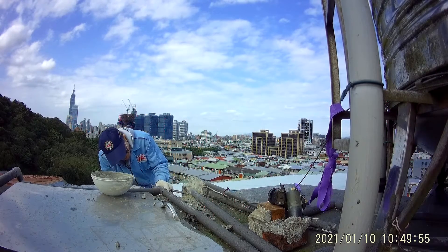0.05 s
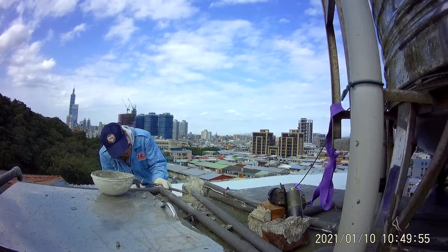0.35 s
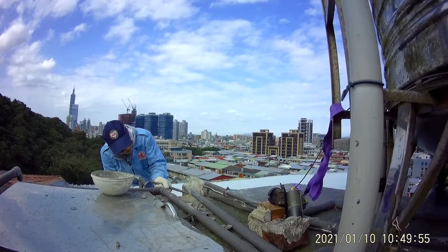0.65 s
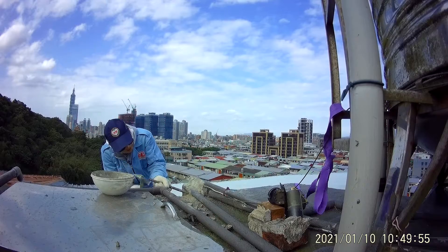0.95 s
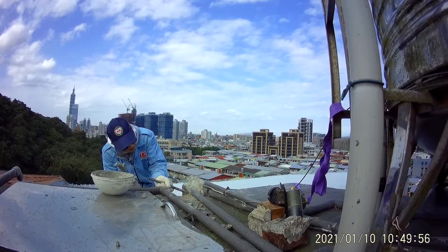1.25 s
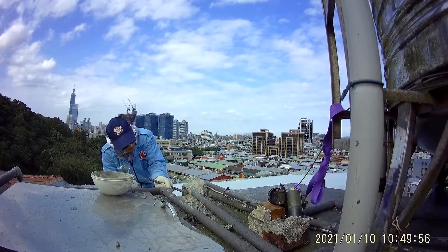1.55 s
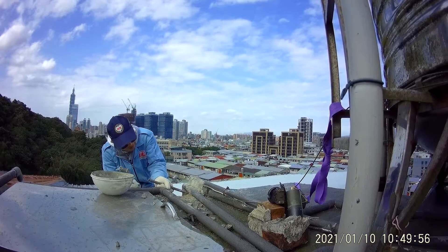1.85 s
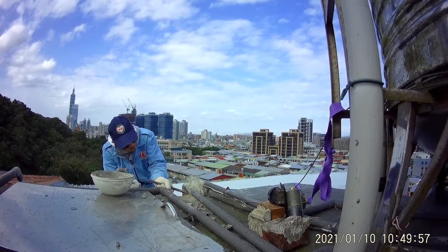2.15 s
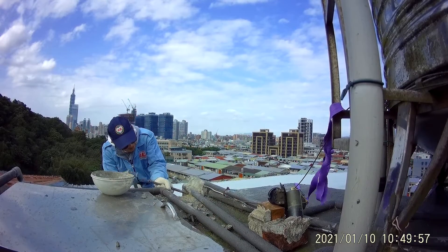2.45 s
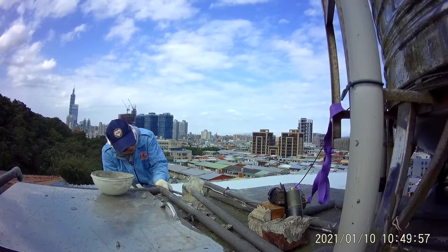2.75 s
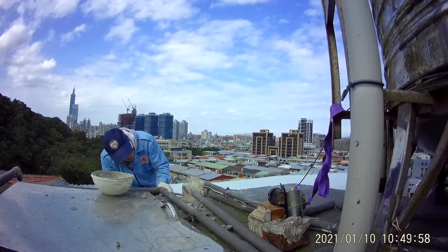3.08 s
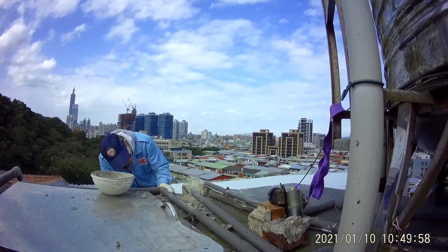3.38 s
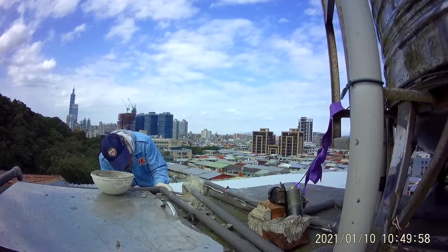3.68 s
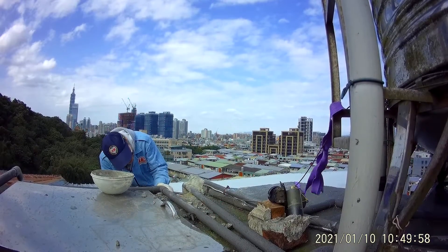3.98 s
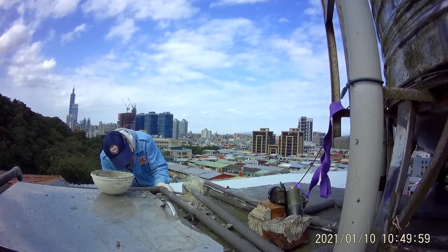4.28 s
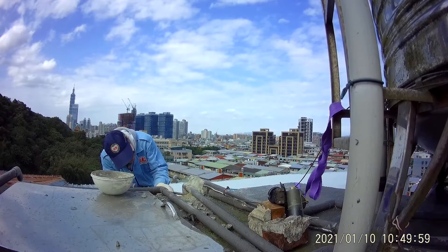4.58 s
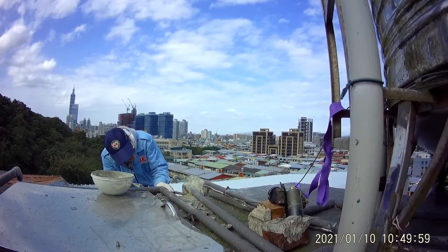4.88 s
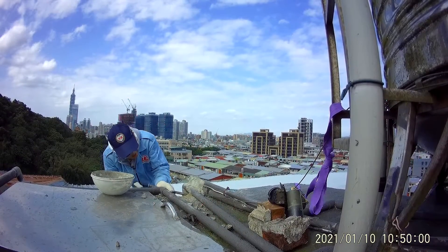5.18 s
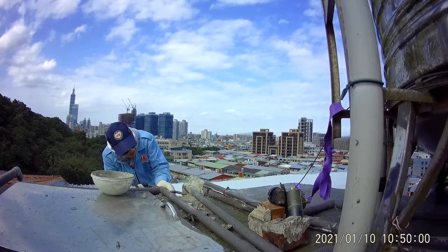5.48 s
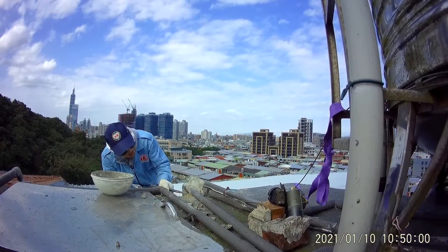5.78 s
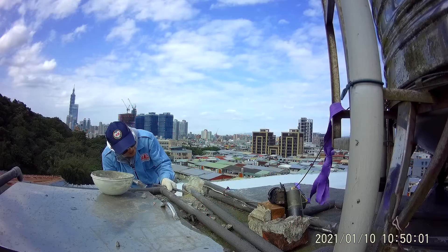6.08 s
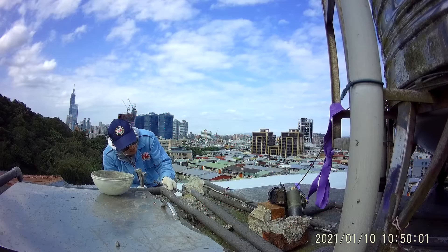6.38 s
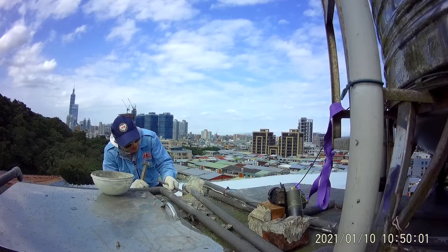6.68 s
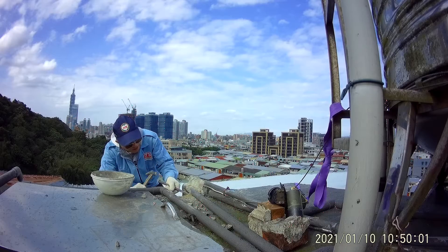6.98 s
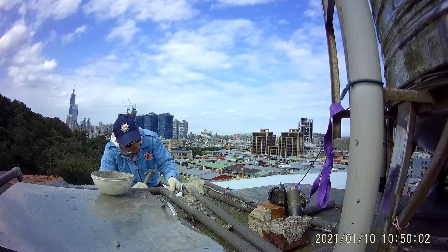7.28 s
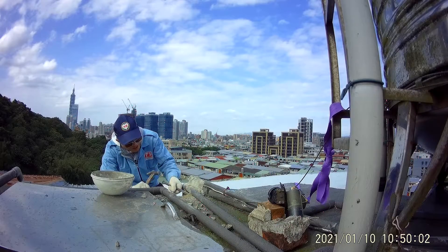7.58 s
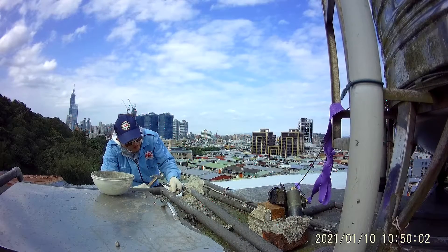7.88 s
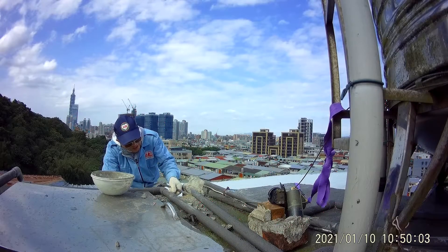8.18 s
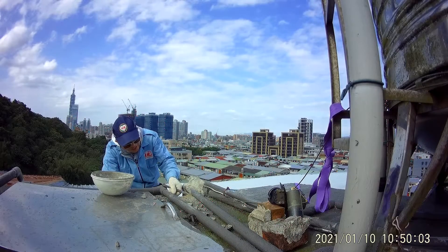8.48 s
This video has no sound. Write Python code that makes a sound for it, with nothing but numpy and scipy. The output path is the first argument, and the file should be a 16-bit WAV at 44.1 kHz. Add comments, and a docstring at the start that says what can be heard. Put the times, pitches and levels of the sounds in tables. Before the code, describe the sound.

Gusts of wind buffet a small outdoor microphone while far-off city traffic rumbles evenly. Over this, a hammer hits a steel chisel against stone: a single blow, a quick run of five, then seven lighter ones and, after a pause, six harder knocks. Each has a short metallic ring and a faint echo off the surrounding roofs and houses, with a few tiny ticks of grit.

```python
"""On a rooftop, houses nearby and traffic in the distance, heard through a small camera's microphone.
A hand hammer drives a steel chisel into masonry in short runs of hard knocks; the roof, a wall and the
houses answer. Now and then the chisel rings on or rebounds, or grit ticks. Gusts buffet the microphone;
the camera's housing colours each blow's bright ring, and its electronics add a faint whine and hiss."""
import sys
import numpy as np
from scipy import signal
from scipy.fft import rfft, irfft, next_fast_len
from scipy.io import wavfile
from scipy.ndimage import map_coordinates

SR = 44100
rng = np.random.default_rng(int(sys.argv[2]) if len(sys.argv) > 2 else 0)


def wrap_up_sound(samples):
    """Save the sound to the file named by the first command line argument, as 16-bit audio."""
    columns = np.atleast_2d(samples).T
    # keep every value between -1 and 1, then stretch to whole-number steps
    tamed = np.clip(columns, -1, 1)
    steps = np.round(tamed * 32767).astype(np.int16)
    wavfile.write(sys.argv[1], SR, steps)


N = 376613
TIME = np.arange(N) / SR
AGE = np.arange(SR // 3) / SR  # seconds since a contact

# Far traffic, wind thumping on the microphone, and its rush. Each row: frequency in Hz, density in dB.
TRAFFIC_SPECTRUM = [(25, 1), (250, -5), (500, -23), (1000, -30), (1500, -25), (2000, -56), (2700, -41),
                    (3400, -49.5), (4700, -44), (5600, -48.5), (12000, -62)]
BUFFET_SPECTRUM = [(8, -16), (25, 0), (75, -5), (140, -12), (280, -25), (600, -39), (2000, -103)]
RUSH_SPECTRUM = [(60, -14), (150, 0), (280, -1.5), (500, -7.5), (950, -15.5), (1550, -17.5), (2050, -32),
                 (2600, -34), (3400, -49.5), (4100, -52), (4700, -45), (5500, -55), (12000, -67)]
# Gusts at the microphone. Each row: time in seconds, strength in dB.
GUSTS = [(0, -27.5), (.21, -2), (.38, -11), (1.02, -9.5), (1.27, 1.5), (1.75, -4), (2.42, -5.5), (2.72, -4),
         (3.14, -8), (3.33, -2), (3.6, 2), (3.82, -4), (4.0, 2), (4.9, -2.5), (5.05, -8.5), (5.3, -14.5),
         (5.48, -7), (6.25, -13), (7.14, -13.5), (7.41, 0), (7.8, -15), (8.18, -11.5), (8.54, -27.5)]
# Sharp puffs of wind. Each row: centre in seconds, relative level in dB, half length in seconds.
PUFFS = [(.571, -26, 0.042), (0.864, -23.5, 0.025), (1.194, -15.5, 0.017), (1.828, -8.5, 0.014),
         (1.881, -9.5, 0.012), (2.188, -17.5, 0.022), (2.677, -16, 0.015), (2.788, -14, 0.0064),
         (2.9, -14.5, 0.011), (3.094, -17, 0.0098), (3.289, -15, 0.047), (3.578, -20, 0.021),
         (4.639, -19.5, 0.01), (4.898, -14.5, 0.0056)]

# Hammer blows. Each row: start in seconds, force in dB, squareness in dB, knock pitch in Hz,
# sharpness in dB, hammer ring in dB. Force, squareness and sharpness are 0 for an average blow.
HAMMER_BLOWS = [(0.6559, 0.5, 4, 1420, 9.5, -31), (1.418, -0.5, 5, 1590, 7.5, -37),
                (1.7029, -2, 5.5, 1282, 3, -24.5), (1.9734, -4, 3, 1314, -0.5, -26.5),
                (2.2454, -2, 5, 1250, 7, -22), (2.5132, -1.5, 2, 1304, -0.5, -33.5),
                (3.7997, -3.5, -1.5, 1347, 2.5, -19.5), (4.093, -5, -3.5, 1420, 0.5, -29),
                (4.3743, -8.5, 1, 1580, -3, -36), (4.654, -4, 2.5, 1560, -10, -46),
                (4.9233, -5.5, -3, 1450, -10, -36), (5.3163, -4, -1, 1300, -3.5, -40.5),
                (5.584, -5, 5.5, 1510, -10.5, -37.5), (7.038, 2.5, -1, 1550, -7, -36.5),
                (7.3548, 6, -5, 1486, 2, -37.5), (7.652, 5.5, 0, 1784, 3, -31),
                (7.941, 6, -.5, 1692, 3, -43), (8.216, 7, -4, 1770, 2.5, -38.5),
                (8.4844, 8, -7.5, 1490, -5.5, -47)]
# Modes of the masonry, the sheet roof and the free chisel.
# Each row: frequency in Hz, relative level in dB, time to fall 60 dB (t60) in seconds.
MASONRY_MODES = [(742, -12, 0.022), (799, -5.5, 0.025), (1026, 0, 0.012)]
SHEET_MODES = [(328, -0.5, 0.12), (432.4, -9, 0.11), (620, -4, 0.095)]
FREE_CHISEL_MODES = [(1020, -1, .06), (2750, 0, .062), (5155, -6, .07), (6172, -11, .15), (10230, 0, .11)]
# Bright ringing of each blow, coloured by the camera housing's resonances (middle, high, highest).
# Each row: frequency in Hz, relative level in dB, t60 in seconds.
HOUSING_MID = [(3214, 8.5, 0.0084), (3970, 0, 0.022), (4650, 3.5, 0.026), (4787, -1, 0.027)]
HOUSING_HIGH = [(6085, 1, 0.016), (6110, -10.5, 0.044)]
HOUSING_TOP = [(9440, 4, 0.03), (9990, 1.5, 0.039), (10830, -6.5, 0.026), (11150, -10.5, 0.013),
               (12150, -10, 0.026)]
# Knock and clack, whose pitch depends on how firmly the chisel's tip sits in its groove.
# Each row: ratio to the pitch, relative level in dB, t60 in seconds.
KNOCK_MODES = [(1, 0, .022), (1.12, -11, .019), (.86, -10, .02)]
CLACK_MODES = [(1, 0, .023), (1.3, -8, .02), (.88, -8, .018)]
# Stone crushing under the edge. Each row: frequency in Hz, density in dB.
CRACK_SPECTRUM = [(150, -39), (450, -4.5), (750, -8.5), (1600, 5.5), (2600, -5.5), (4700, -4.5),
                  (5400, -20), (6200, -3), (8300, -30), (9700, -35), (11500, -23), (15500, -48)]
# Dulling of the echoes. Each row: frequency in Hz, gain in dB.
ECHO_TONE = [(700, 2.5), (1400, 1), (1800, -2), (2200, -8), (2800, 2), (3500, -11.5), (4700, -7),
             (6200, -10.5), (9000, -6)]
# Echo tails of the roof and of the nearby houses. Each row: frequency in Hz, t60 in seconds.
ROOF_DECAY = [(300, 0.055), (1500, 0.22), (4000, 0.11), (11000, 0.038)]
HOUSES_DECAY = [(300, 2.8), (1500, 1.46), (3000, 0.61), (6000, 0.67), (11000, 0.4)]
# The loosely held chisel ringing on.
# Each row: start in seconds, gain of the lowest mode in dB, gain of the highest in dB.
LOOSE_RINGS = [(0.658, -24, -40), (2.516, -33, -34.5), (4.926, -13.5, -32), (5.586, -26, -36.5),
               (5.917, -36, -57), (7.04, -70, -30)]
# Ticks of grit and quick rebounds of the tool. Each row: start in seconds, relative level in dB.
TICKS = [(1.598, -42), (1.832, -38), (1.886, -33.5), (2.422, -40.5), (2.6283, -38.5), (2.805, -42),
         (4.9427, -27), (8.518, -36)]
# The camera's electronic whine. Each row: frequency in Hz, rms level in dB.
WHINE_TONES = [(7238, -81), (7294, -72), (7350, -71), (7406, -80), (7462, -83), (14644, -77)]

THUD_DB, KNOCK_DB, CLACK_DB = -27, -21, -29  # these six hold for an average blow
MID_DB, HIGH_DB, TOP_DB = -27.5, -34, -34.5
CLACK_HZ, HAMMER_HZ = 2433, 7775  # an average clack; the hammer head's ring
WALL_DELAY_S, WALL_DB = 0.041, -38
ROOF_GAIN_DB, HOUSES_GAIN_DB = -15, -24
BUFFET_DB, RUSH_DB = -20, -29.5  # at a gust strength of 0 dB
CUTOFF_HZ = 15900  # the camera's upper limit


def amp(db):
    """Decibels to gain."""
    return 10 ** (np.asarray(db) / 20)


def unit(x):
    """Scale to rms 1."""
    return x / np.sqrt(np.mean(x ** 2) + 1e-20)


def unit_hit(x):
    """Scale so that the first hundredth of a second has rms 1."""
    return x / np.sqrt(np.mean(x[:SR // 100] ** 2) + 1e-20)


def along(points, hz):
    """Read (Hz, value) points on a log frequency axis."""
    point_hz, values = np.transpose(points)
    return np.interp(np.log(hz + 1), np.log(point_hz), values)


def filtered(x, response):
    """Filter x by a gain given as a function of frequency."""
    size = next_fast_len(len(x) + SR // 4)
    return irfft(rfft(x, size) * response(np.fft.rfftfreq(size, 1 / SR)), size)[:len(x)]


def coloured(x, spectrum):
    """Filter x by a curve of (Hz, dB) points."""
    return filtered(x, lambda hz: amp(along(spectrum, hz)))


def noise(spectrum, size=N):
    """Coloured noise of rms 1."""
    return unit(coloured(rng.standard_normal(size), spectrum))


def wobble(rate):
    """A smooth random curve, rate knots a second."""
    return map_coordinates(rng.standard_normal(int(N * rate / SR) + 4), [TIME * rate])


def add(track, start_s, sound):
    """Mix a sound into the track."""
    part = track[max(round(start_s * SR), 0):][:len(sound)]
    part += sound[:len(part)]


def fade(t60, attack):
    """A quick rise and an exponential decay, both timed in seconds."""
    return amp(-60 * AGE / t60) * (1 - np.exp(-(AGE / attack) ** 2))


def burst(spectrum, t60, attack):
    """A short, dying burst of coloured noise."""
    return unit_hit(noise(spectrum, len(AGE)) * fade(t60, attack))


def ring(modes, detune, attack, pitch=1):
    """Damped modes that vary from blow to blow; pitch turns ratios into Hz."""
    out = np.zeros(len(AGE))
    for frequency, db, t60 in modes:
        shift, strength, phase = rng.standard_normal(3)
        hz = frequency * pitch * (1 + detune * shift)
        out += amp(db + 2 * strength) * fade(t60, attack) * np.sin(2 * np.pi * (hz * AGE + phase))
    return unit_hit(out)


def traffic():
    """Far off, the city's traffic blends into an even rumble."""
    return amp(-41 + 0.17 * wobble(4.2)) * noise(TRAFFIC_SPECTRUM)


def wind():
    """Right on the microphone port, eddies thump, flutter the rush and crackle at their peaks."""
    strength_db = np.interp(TIME, *np.transpose(GUSTS))
    eddies = wobble(34)
    buffet = amp(BUFFET_DB + 0.94 * strength_db + 4 * eddies) * noise(BUFFET_SPECTRUM)
    rush_gain = amp(RUSH_DB + 1.313 * strength_db + 2.96 * eddies + 2.02 * wobble(110))
    clicks = rng.standard_normal(N) * (rng.random(N) < 60 / SR)  # about 60 a second
    crackle = unit(coloured(clicks, [(1500, 0), (4700, 9), (8000, -1), (15000, -29)]))
    rush = rush_gain * (noise(RUSH_SPECTRUM) + amp(-49) * crackle)
    puff_gain = sum(amp(db) * np.exp(-0.5 * ((TIME - at) / half) ** 2) for at, db, half in PUFFS)
    puff_air = amp(3.5) * noise(BUFFET_SPECTRUM) + amp(-11) * noise(RUSH_SPECTRUM)
    return buffet + rush + puff_gain * puff_air


def blow(force_db, square_db, knock_hz, sharp_db, ring_db):
    """One contact: masonry thuds, chisel knocks, hammer rings; the camera housing colours the treble."""
    thud_db = THUD_DB + force_db
    thud = amp(thud_db) * ring(MASONRY_MODES, detune=0.049, attack=0.00071)
    # the sheet roof takes up the thud slowly
    sheet = amp(thud_db - 25.5) * ring(SHEET_MODES, detune=0.063, attack=0.019)
    # a square blow knocks, a skewed one clacks
    knock_db = KNOCK_DB + force_db + square_db
    knock = amp(knock_db) * ring(KNOCK_MODES, detune=0.01, attack=0.001, pitch=knock_hz)
    clack_db = CLACK_DB + 0.13 * force_db - 0.93 * square_db + 0.29 * sharp_db
    clack_hz = CLACK_HZ - 33 * force_db + 28.5 * square_db  # lower when harder, higher when squarer
    clack = amp(clack_db) * ring(CLACK_MODES, detune=0.025, attack=0.0006, pitch=clack_hz)
    # sharper, shorter contacts and heavier blows ring brighter
    mid_db = MID_DB + 0.39 * sharp_db
    mid = amp(mid_db) * ring(HOUSING_MID, detune=0.036, attack=0.00067)
    high = amp(HIGH_DB + sharp_db) * ring(HOUSING_HIGH, detune=0.0037, attack=0.00035)
    top_db = TOP_DB + 0.88 * sharp_db + 0.47 * force_db
    top = amp(top_db) * ring(HOUSING_TOP, detune=0.018, attack=0.00054)
    head = amp(ring_db) * unit_hit(fade(t60=0.072, attack=0.003) * np.sin(2 * np.pi * HAMMER_HZ * AGE))
    # stone crushes under the edge; steel meeting steel adds a bright snap
    crack = amp((knock_db + mid_db) / 2) * burst(CRACK_SPECTRUM, t60=0.037, attack=0.00036)
    snap = amp(top_db - 2) * burst([(3000, -8), (9000, -4), (15500, -21)], t60=0.048, attack=0.0004)
    # the knock, clack and bright ring carry almost no bass
    low_cut = signal.butter(2, 750, 'highpass', fs=SR, output='sos')
    strike = signal.sosfilt(low_cut, knock + clack + mid + high + top + crack + snap)
    return thud + sheet + strike + head


def echo(x, decay, build_s):
    """A diffuse answer that builds up, then dies at each frequency's own speed."""
    hz, seconds, bins = signal.stft(rng.standard_normal((2, SR))[0], SR, nperseg=256)
    dying = amp(-60 * seconds / along(decay, hz)[:, None])
    _, tail = signal.istft(bins * dying, SR, nperseg=256)
    tail_age = np.arange(len(tail)) / SR
    tail *= 1 - np.exp(-(tail_age / build_s) ** 2)
    return signal.fftconvolve(x, tail / np.linalg.norm(tail))


def chiselling():
    """Each blow reaches the microphone direct, off one wall and, duller, off the roof and the houses."""
    out = np.zeros(N)
    for start_s, force_db, square_db, knock_hz, sharp_db, ring_db in HAMMER_BLOWS:
        direct = blow(force_db, square_db, knock_hz, sharp_db, ring_db)
        # sound leaving the blow in other directions blurs the knock's pitch in the echoes
        spread_db = KNOCK_DB + force_db + square_db / 2 - 0.5
        spread = amp(spread_db) * burst(CRACK_SPECTRUM, t60=0.02, attack=0.001)
        dull = coloured(amp(-7) * direct + spread, ECHO_TONE)
        add(out, start_s, direct)
        add(out, start_s + WALL_DELAY_S, amp(WALL_DB) * direct)
        add(out, start_s, amp(ROOF_GAIN_DB) * echo(dull, ROOF_DECAY, build_s=0.0031))
        add(out, start_s, amp(HOUSES_GAIN_DB) * echo(dull, HOUSES_DECAY, build_s=0.024))
    return out


def loose_chisel():
    """When the chisel springs free of the stone its bending modes sing on."""
    out = np.zeros(N)
    low_hz, high_hz = FREE_CHISEL_MODES[0][0], FREE_CHISEL_MODES[-1][0]
    for start_s, low_db, high_db in LOOSE_RINGS:
        for hz, db, t60 in FREE_CHISEL_MODES:
            level_db = db + along([(low_hz, low_db), (high_hz, high_db)], hz)
            add(out, start_s, amp(level_db) * fade(t60, attack=0.0039) * np.sin(2 * np.pi * hz * AGE))
    return out


def ticks():
    """Small ticks of grit, and the tool's quick rebound just after a blow."""
    out = np.zeros(N)
    for start_s, db in TICKS:
        tick = burst([(1000, 2), (4700, 0.5), (8000, -9), (15000, -18)], t60=0.019, attack=0.00096)
        add(out, start_s, amp(db - 13) * tick)
    return out


def scene():
    """The rooftop in mono: traffic far off, chisel work on the roof, wind on the microphone."""
    return (traffic() + chiselling() + loose_chisel() + ticks() + wind())[None]


def record(dry):
    """The camera adds hiss and a fuzzy electronic whine, rounds off the peaks and cuts the top."""
    whine = sum(amp(db) * np.sqrt(2) * np.sin(2 * np.pi * hz * TIME + 0.5 * wobble(53))
                for hz, db in WHINE_TONES)
    fuzz = amp(-73) * noise([(6900, -60), (7220, -11), (7330, 4.5), (7460, 3.5), (7700, -55)])
    hiss = amp(-68) * rng.standard_normal(N)
    mix = dry[0] + whine + fuzz + hiss
    rounded = mix / (1 + np.abs(mix / 0.78) ** 6) ** (1 / 6)  # soft ceiling at 0.78
    return filtered(rounded, lambda hz: hz < CUTOFF_HZ)[None]


dry = scene()
out = record(dry)
wrap_up_sound(out)
```